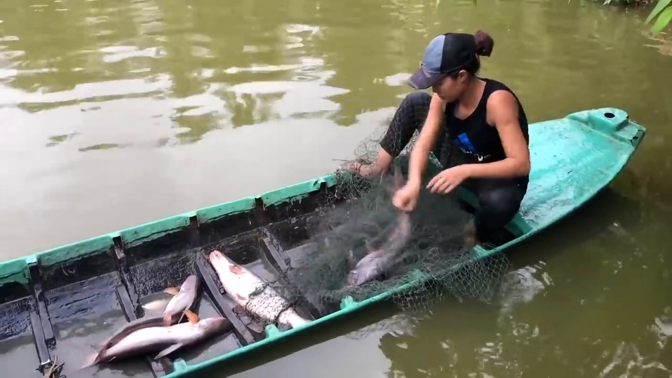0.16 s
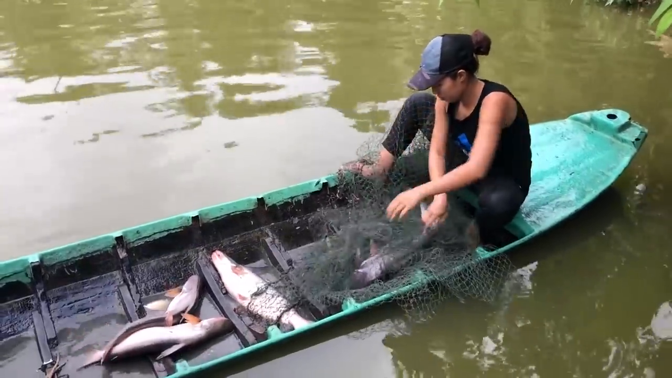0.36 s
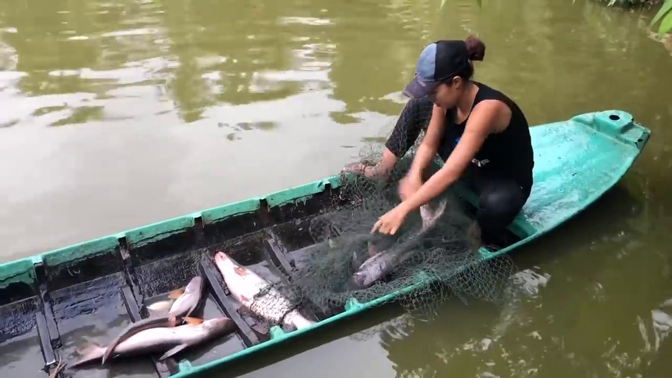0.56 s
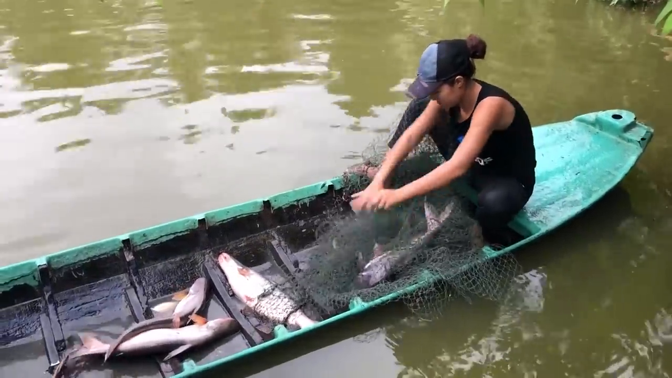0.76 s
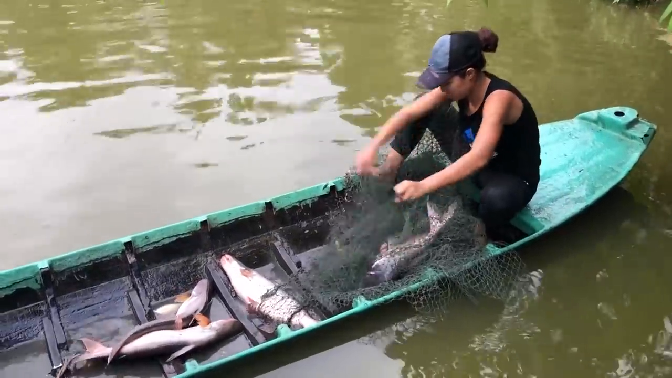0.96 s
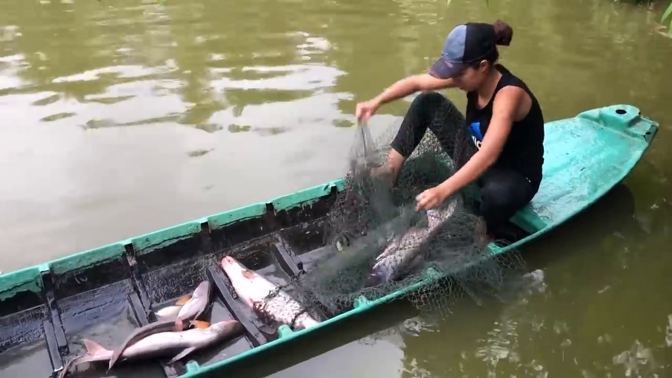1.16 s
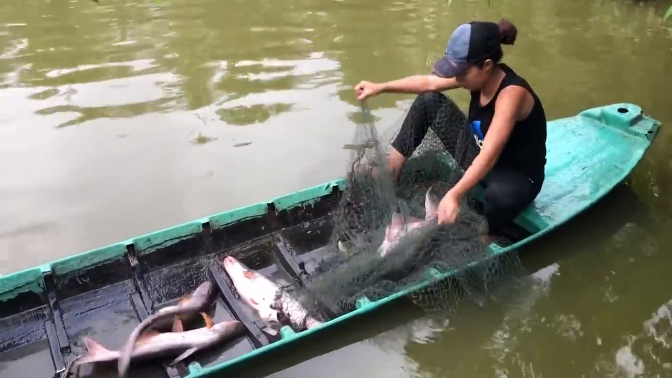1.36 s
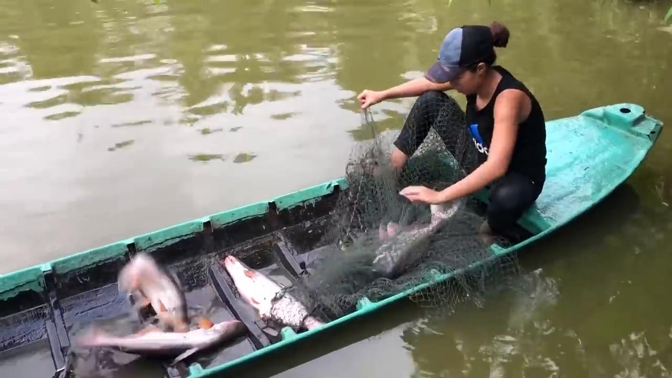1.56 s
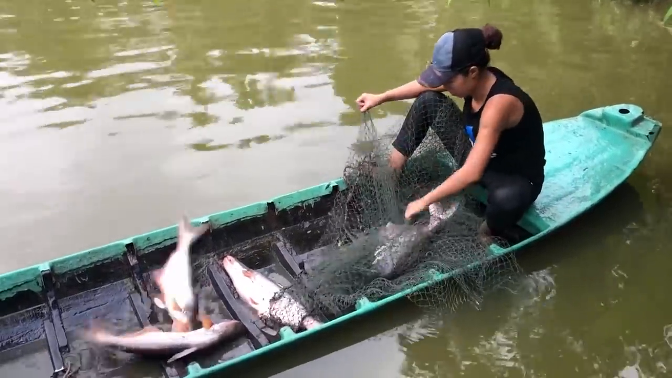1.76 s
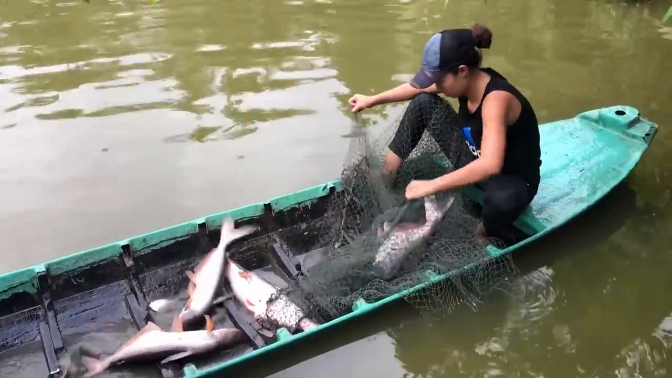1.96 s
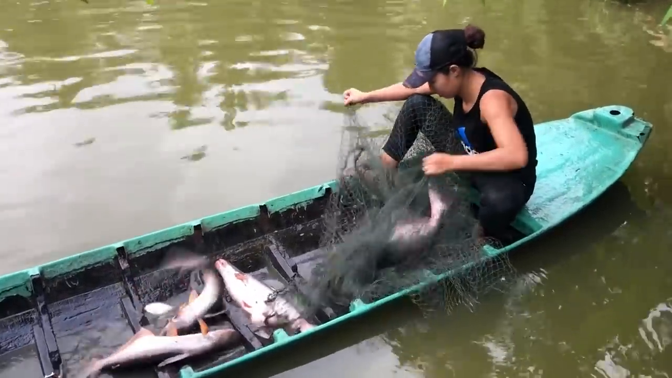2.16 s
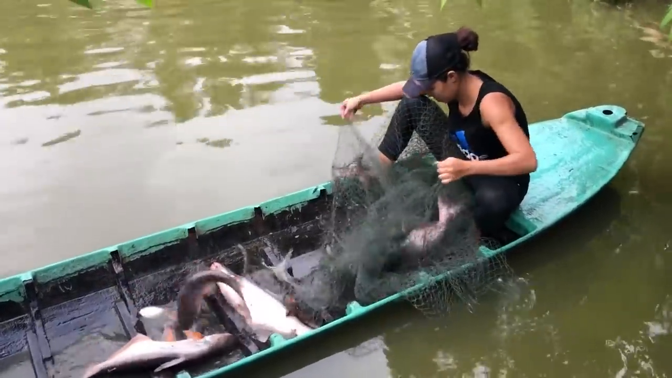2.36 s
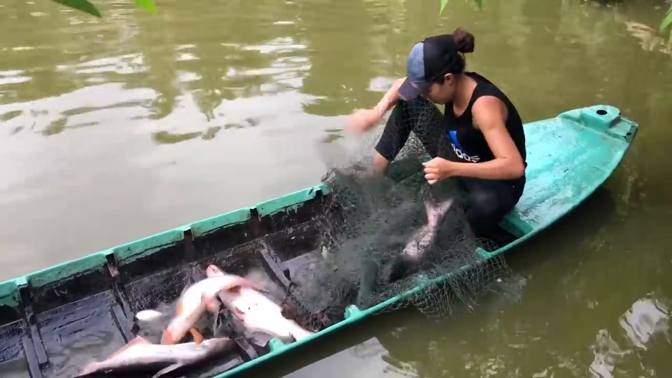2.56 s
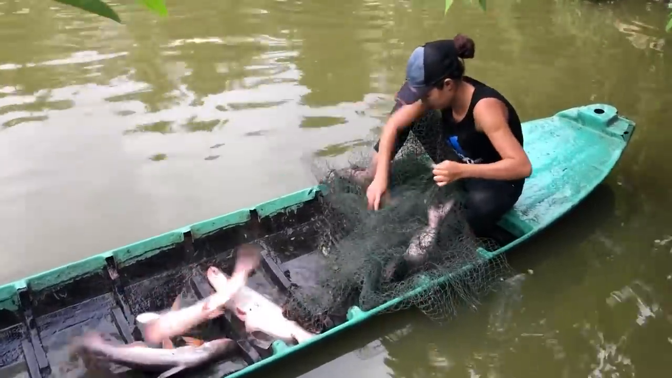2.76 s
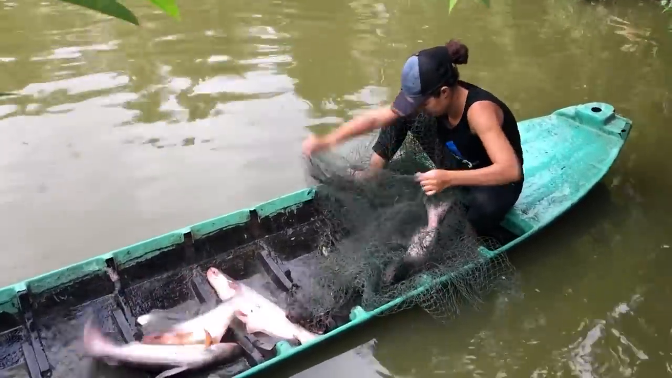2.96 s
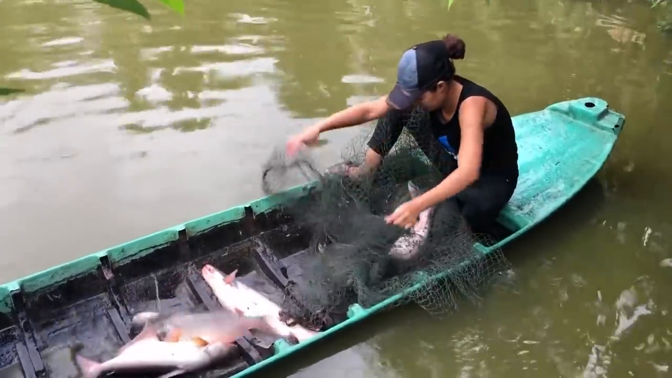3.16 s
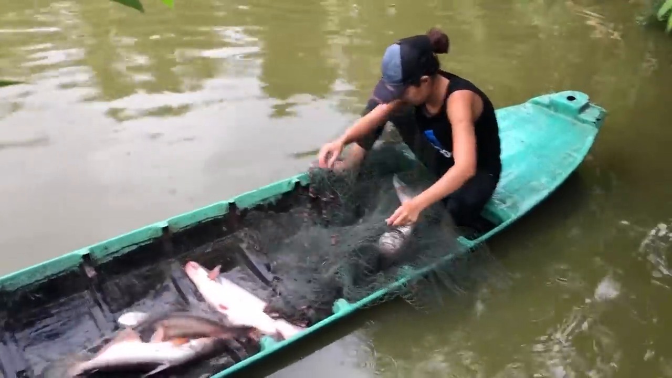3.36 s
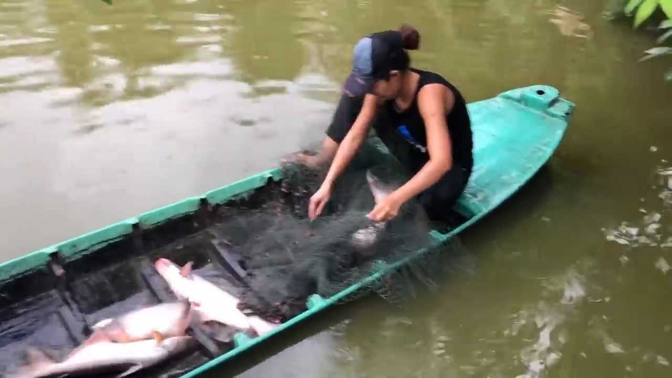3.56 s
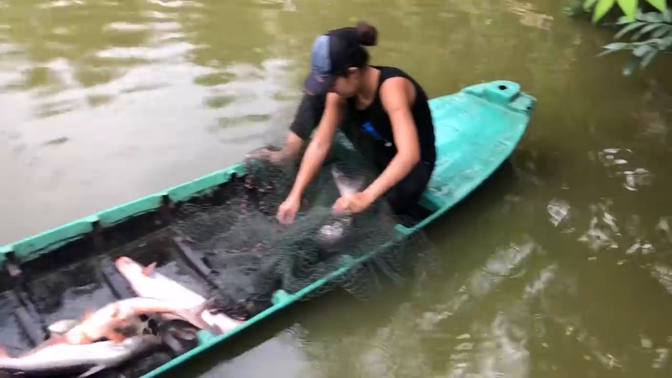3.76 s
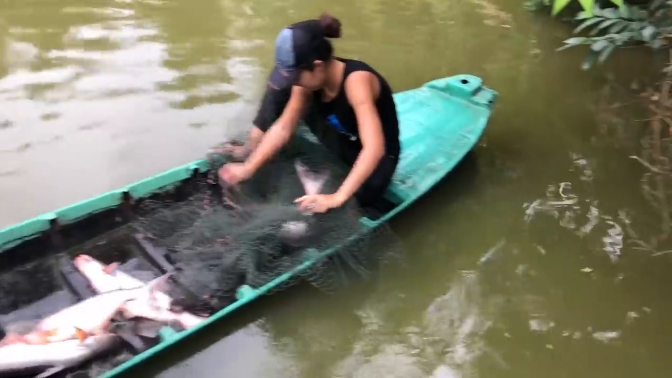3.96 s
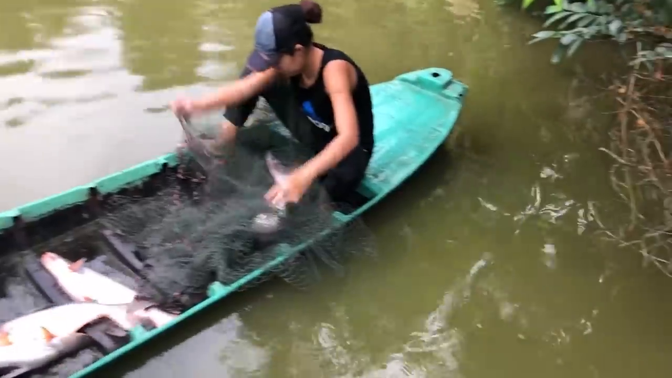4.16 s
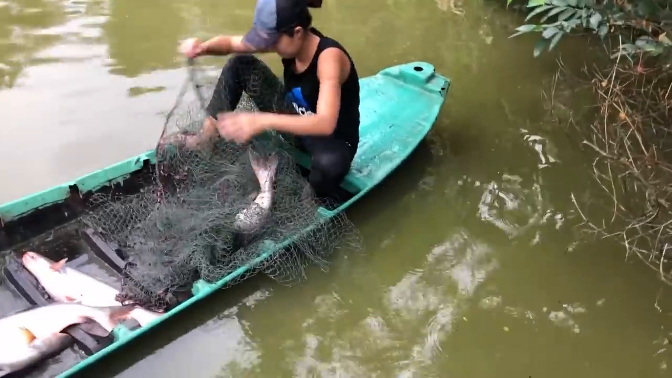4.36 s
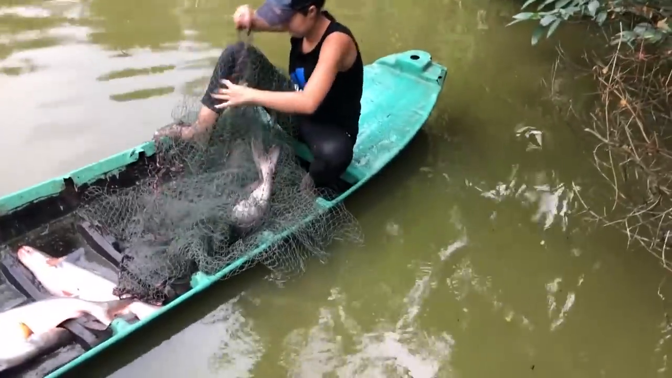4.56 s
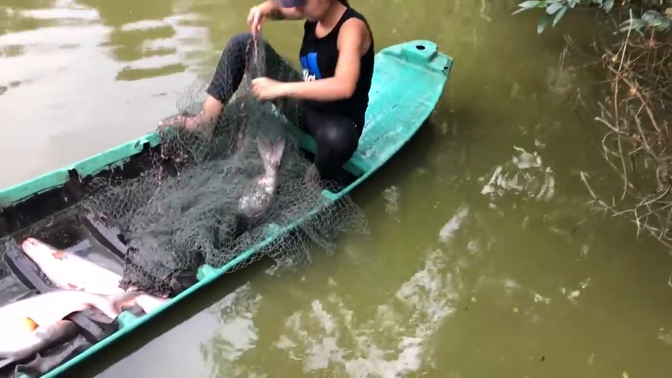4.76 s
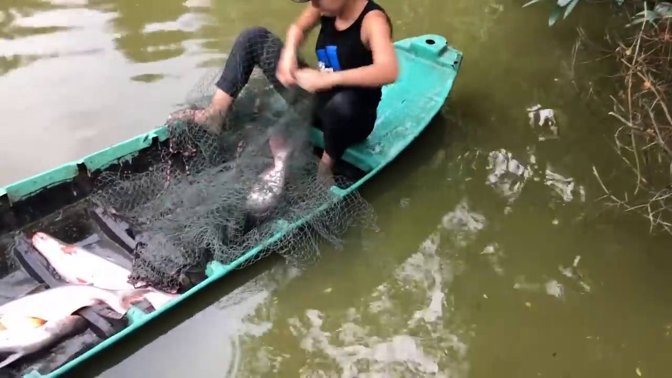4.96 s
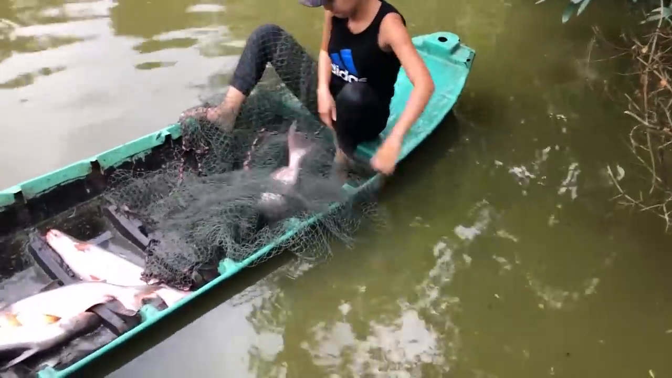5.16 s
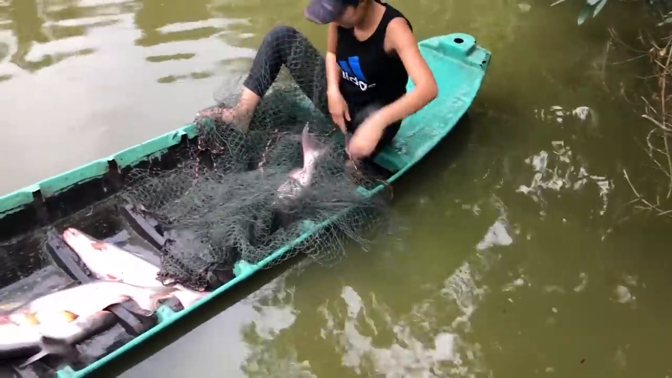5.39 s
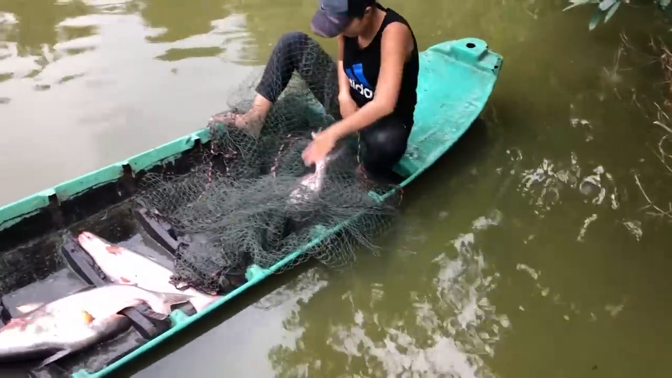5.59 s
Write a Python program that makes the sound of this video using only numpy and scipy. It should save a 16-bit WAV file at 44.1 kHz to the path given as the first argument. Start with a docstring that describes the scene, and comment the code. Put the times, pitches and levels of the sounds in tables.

```python
"""Fresh-caught fish flop in the bilge of a small canoe on a still pond, over a low wavering outdoor rumble.
It opens with faint net rustle (crackling noise), a barely stirred bilge, soft knocks (pitched rings) and
near 1 s small bright net snaps. From 1.5 to 3.8 s the fish flop hardest: slaps (filtered contact and spray
noise), knocks, a loud pop, hull thumps (struck modes), splashes and bubbles (gliding sines). It then calms
to light slaps and snaps, bubbles and net rustle, a knock at 5.3 s and a last faint stir of the water."""
import sys
import numpy as np
from scipy import signal
from scipy.fft import rfft, irfft, next_fast_len
from scipy.io import wavfile
from scipy.ndimage import uniform_filter1d

SR = 44100
rng = np.random.default_rng(int(sys.argv[2]) if len(sys.argv) > 2 else 0)


def transcribe(u):
    """Save the signal u as a 16-bit wav file named by the first command-line argument.

    u: samples, shape (n,) or (channels, n), limited to [-1, 1]; the rate is SR.
    q: integer samples, one column per channel.
    """
    v = np.clip(np.atleast_2d(u).T, -1, 1)
    q = np.round(v * 32767).astype(np.int16)
    wavfile.write(sys.argv[1], SR, q)


N = 248283
TIME = np.arange(N) / SR  # s
AGE = TIME[:SR // 3]  # s since a hit; the time base of every single hit
TOP_HZ = 16000  # top cut of the microphone, and the highest swarm bubble

# spectrum of the outdoor rumble and hiss: freq_hz, density_db (per Hz)
OUTDOOR_SPECTRUM = [(20, -10.5), (50, -2.5), (80, -4), (108, -2.5), (180, -9), (250, -15.5), (400, -25.5),
                    (700, -28.5), (1300, -28.5), (2200, -38.5), (5000, -40), (9400, -41.5), (16000, -47)]
OUTDOORS_DB = -58.5
# pulls on the net: start_s, length_s, level_db, brightness_db (fine hiss over coarse swish)
NET_PULLS = [(0, 0.37, -74, 9), (0.8, 0.13, -69, 9), (0.995, 0.41, -70, 3), (1.493, 2.1, -68, -4),
             (3.6, 0.69, -70.5, -2), (4.417, .45, -67.5, -30), (5.053, 0.51, -74.5, -3.5)]
NET_TIGHTEN_S, NET_SLACKEN_S = 0.039, 0.075
# bouts of wriggling that stir the bilge: start_s, length_s, slosh_db, spray_db
WRIGGLE_BOUTS = [(0, 0.26, -76.5, -89), (.42, .33, -77, -91), (1.472, 0.072, -55.5, -65),
                 (1.62, 0.18, -63.5, -65.5), (1.915, 0.14, -64, -65.5), (2.028, 0.034, -57, -67),
                 (2.35, 0.046, -69.5, -57), (2.461, 0.063, -65.5, -59), (2.558, 0.12, -57.5, -66),
                 (2.635, 0.065, -55.5, -51.5), (2.864, 0.08, -59, -56), (3.004, 0.19, -60.5, -62.5),
                 (3.225, 0.083, -58, -53.5), (3.306, 0.075, -53.5, -57), (3.422, .11, -58.5, -64.5),
                 (3.631, 0.033, -63, -67), (3.733, 0.064, -66.5, -73), (3.888, 0.34, -67, -71.5),
                 (5.301, 0.038, -67.5, -78), (5.45, 0.24, -77, -84)]
STIR_S, SETTLE_S, CALM_DB = 0.016, 0.053, -79  # water gets moving, settles, and laps on faintly
# spray is airborne briefly, thins out, and dribbles on
SPRAY_LAG_S, SPRAY_FALL_S, DRIBBLE_DB = 0.008, 0.049, -80
# spectrum of stirred water: freq_hz, density_db (per Hz)
WASH_SPECTRUM = [(150, -21.5), (500, -1.5), (1200, -6), (2500, -5.5), (6000, -18.5), (16000, -23.5)]
# single large bubbles, and the short pitched ring of a slap at 1.49 s:
# start_s, level_db, starting_pitch_hz, life_s
BUBBLES_AND_SLAP_RING = [(1.491, -37, 2190, 0.007), (1.604, -49, 1270, 0.018), (1.682, -39, 1296, 0.022),
                         (2.043, -44.5, 1946, 0.01), (2.088, -43, 964, 0.03), (2.394, -45.5, 1220, .009),
                         (2.466, -41.5, 846, 0.026), (2.592, -41, 895, 0.012), (2.612, -36.5, 554, .03),
                         (2.681, -46, 1435, .014), (2.697, -41, 1770, .017), (3.019, -41.5, 1070, 0.011),
                         (3.171, -43, 1090, 0.014), (3.307, -36.5, 1420, 0.01), (3.328, -41, 1350, 0.016),
                         (3.335, -37, 3390, .0075), (3.369, -37.5, 870, 0.012), (3.426, -44, 2450, .015),
                         (3.786, -34, 1600, 0.0098), (4.011, -47.5, 1740, 0.0063),
                         (4.062, -48.5, 703, 0.091), (4.216, -45, 1540, 0.011), (4.232, -41.5, 1076, 0.013),
                         (4.85, -54, 2290, .012), (4.892, -55, 2350, 0.0087), (5.021, -55, 728, 0.011)]
BUBBLE_RISE_OCT_PER_S = 13  # every row of that table climbs in pitch at the same pace
# body knocks on the planks, and one loud short pop at 3.73 s: start_s, level_db,
# starting_pitch_hz, plank_db (trim of plank ring and squelch against the pitched part)
KNOCKS_AND_POP = [(.103, -56.5, 720, 11), (0.174, -57, 604, 2), (.207, -55, 1190, 0),
                  (.229, -45.5, 1340, 2.5), (.283, -57.5, 647, -2.5), (.428, -60, 647, 6.5),
                  (1.487, -45, 426, -8), (1.493, -35.5, 626, -9), (1.505, -39, 590, -6),
                  (1.519, -40.5, 560, -1.5), (1.555, -44.5, 520, -7), (1.703, -45, 603, 1.5),
                  (2.333, -31.5, 1880, -4.5), (2.440, -41.5, 600, 3.5), (2.600, -39, 494, 1),
                  (2.634, -29, 573, -4.5), (2.899, -48.5, 990, 1), (3.1022, -34.5, 692, -3),
                  (3.3095, -30.5, 875, -11), (3.315, -35, 930, -12), (3.326, -34.5, 1010, -10),
                  (3.354, -28.5, 783, -26), (3.3595, -33.5, 853, -10.5), (3.423, -41.5, 684, -5),
                  (3.441, -43, 506, -0.5), (3.7285, -19.5, 1900, -19.5), (5.305, -49, 384, -1)]
POCKET_CYCLES = 23  # the pitched part falls by 60 dB in this many cycles of its starting pitch
# nominal ringing modes of the planks: pitch_hz, level_db, t60_s
PLANK_MODES = [(460, -6, 0.089), (615, -3.5, 0.12), (825, 3.5, 0.043), (1370, -1.5, 0.032),
               (1630, -1.5, 0.06), (1778, -5.5, 0.041), (2030, -10.5, 0.039)]
# spectrum of squelching wet skin: freq_hz, density_db (per Hz)
SQUELCH_SPECTRUM = [(150, -10), (500, -1.5), (1200, 4.5), (2200, -11), (3500, -19.5), (12000, -20.5)]
# wet slaps, and small bright snaps of the tugged net: start_s, level_db, contact_s, centre_hz, width_hz
SLAPS_AND_SNAPS = [(.968, -53, .003, 8700, 2500), (1.039, -41.5, 0.002, 9800, 4000),
                   (1.5546, -36, 0.0018, 3180, 6040), (1.658, -38, .0024, 3670, 1500),
                   (1.697, -38.5, 0.0034, 4570, 3500), (1.727, -40.5, .003, 2200, 2500),
                   (1.766, -28.5, 0.00073, 2980, 2960), (1.775, -36, 0.0011, 3970, 8000),
                   (1.8522, -51.5, 0.00075, 12000, 6000), (1.911, -32.5, 0.0026, 5700, 4900),
                   (1.992, -43, 0.0011, 9000, 4000), (2.3104, -43, 0.0036, 3200, 5000),
                   (2.327, -33, .003, 5000, 9000), (2.3337, -15.5, 0.00049, 4030, 2780),
                   (2.3332, -17.5, 0.00036, 10400, 6000), (2.444, -43.5, 0.0031, 5000, 8000),
                   (2.579, -33.5, .005, 5000, 8000), (2.6366, -22, 0.0018, 4220, 8000),
                   (2.865, -38.5, 0.0027, 3070, 7000), (2.89, -33.5, 0.0075, 2500, 6000),
                   (2.901, -33, 0.002, 3020, 7000), (3.0108, -36, 0.0032, 3600, 3000),
                   (3.034, -37.5, 0.0035, 2150, 5900), (3.0755, -27.5, 0.0022, 1900, 2500),
                   (3.0773, -26, .001, 3950, 4500), (3.233, -38.5, 0.0014, 2600, 5000),
                   (3.7288, -23.5, 0.0013, 2920, 1420), (3.908, -48, 0.0041, 7000, 6900),
                   (3.989, -41, 0.0039, 3340, 3840), (4.0743, -42.5, .0012, 5200, 5970),
                   (4.166, -49, 0.0036, 3500, 1200), (4.355, -52, .0017, 6030, 2500)]
SPRAY_DB = -10  # every hit carries the same share of spray noise
SWEEP_DB, SWEEP_S = -18, 0.0039  # a swish swells just before each hit
# heavy bodies landing on the hull: start_s, level_db
HULL_THUMPS = [(1.491, -38), (1.772, -33.5), (1.794, -30), (2.331, -39.5), (2.633, -37), (2.669, -33)]
# nominal modes of the floating hull: pitch_hz, level_db, t60_s
HULL_MODES = [(73.6, -11, 0.032), (106, -5, 0.077), (173.5, -2, 0.048), (260, -6, 0.031)]
# response of the microphone: freq_hz, gain_db
MICROPHONE_RESPONSE = [(20, 3), (5000, -3.5), (6500, -3.5), (9200, -0.5), (10500, -7), (11800, -6.5),
                       (13200, -1.5), (14500, -6.5), (16000, -6.5)]


def undb(db):
    """Decibels to gain."""
    return 10 ** (np.asarray(db) / 20)


def unit(x):
    """Scale to rms 1."""
    return x / np.sqrt(np.mean(x ** 2))


def blow(x):
    """Scale a short sound to the energy of one millisecond at full scale."""
    return x * np.sqrt(SR / 1000 / np.sum(x ** 2))


def fade(t60, age=AGE):
    """Exponential decay by 60 dB in t60 seconds."""
    return np.exp(-np.log(1000) * age / t60)


def add(track, s, sound):
    """Mix a sound into the track at time s."""
    i = min(max(int(s * SR), 0), N)
    track[i:i + len(sound)] += sound[:N - i]


def gesture(s, length, attack, release):
    """Envelope of one movement: builds up, holds until its length is over, dies away."""
    build = np.clip((TIME - s) / attack, 0, 1)
    return build * np.exp(-np.maximum(TIME - s - length, 0) / release)


def walk(rate, size=N):
    """Smooth random wander with an rms of 1, heading for a new value rate times a second."""
    k = int(SR / rate)
    steps = np.repeat(rng.standard_normal(size // k + 1), k)
    return unit(uniform_filter1d(steps, k)[:size])


def resonate(x, hz, width):
    """Two-pole band-pass around hz, with a limit on centre and width."""
    hz = min(hz, 0.4 * SR)
    q = max(hz / width, 3 * hz / SR)
    return signal.lfilter(*signal.iirpeak(hz, q, fs=SR), x)


def colour(x, points):
    """Causal minimum-phase filter with the given (Hz, dB) response."""
    hz, db = np.transpose(points)
    size = next_fast_len(len(x) + SR // 4) // 2 * 2
    bins_hz = np.arange(size // 2 + 1) * SR / size + 1  # 1 Hz up, so the log is finite
    gain = undb(np.interp(np.log(bins_hz), np.log(hz), db))
    # folding the cepstrum onto positive time makes the filter causal
    cepstrum = irfft(np.log(gain))
    cepstrum[1:size // 2] *= 2
    cepstrum[size // 2 + 1:] = 0
    return irfft(rfft(x, size) * np.exp(rfft(cepstrum)))[:len(x)]


def crackle(rate, size_db, t60):
    """Dense tiny clicks of uneven size, rate per second, layered with a short noise tail behind each."""
    chance, size = rng.random(N), np.clip(rng.standard_normal(N), -2, 2)
    clicks = (chance < rate / SR) * undb(size_db * size) * rng.choice([-1, 1], N)
    tail_power = np.abs(signal.fftconvolve(clicks ** 2, fade(t60) ** 2)[:N])
    tail = rng.standard_normal(N) * np.sqrt(tail_power)
    return unit(unit(clicks) + unit(tail))


def bubble(hz, life, rise, swell=0.2):
    """A pocket of air swells into its ring and climbs rise octaves over its life as it nears the surface."""
    age = TIME[:int(2 * life * SR)] / life  # in lives
    pitch = hz * 2 ** (rise * np.minimum(age, 1))
    return blow(age * np.exp(-age / swell) * np.sin(2 * np.pi * np.cumsum(pitch) / SR))


def swarm(centre_hz, octaves, size_db, cycles, count):
    """A crowd of bubbles of uneven size and pitch, rms 1; higher ones ring shorter."""
    out = np.zeros(N)
    spread = octaves * np.clip(rng.standard_normal(128), -2, 2)
    pitches = np.minimum(centre_hz * 2 ** spread, TOP_HZ)
    shapes = [bubble(hz, cycles / hz, rng.uniform(0, 0.43)) for hz in pitches]
    times = rng.uniform(0, N / SR, count)
    sizes = undb(size_db * np.clip(rng.standard_normal(count), -2, 2))
    for k in range(count):
        add(out, times[k], sizes[k] * shapes[k % len(shapes)])
    return unit(out)


def ring(modes):
    """Struck modes; every spot of the boat weights and tunes them a little differently."""
    chance = rng.standard_normal((len(modes), 2)) * [2, 0.025]  # dB, fraction of pitch
    out = np.zeros(len(AGE))
    for (hz, db, t60), (off_db, detune) in zip(modes, chance):
        out += undb(db + off_db) * fade(t60) * np.sin(2 * np.pi * hz * (1 + detune) * AGE)
    return blow(out)


def outdoors(waver_db=1.0):
    """A low, gently wavering rumble with a faint hiss above, made of coloured noise."""
    air = unit(colour(rng.standard_normal(N), OUTDOOR_SPECTRUM))
    return undb(OUTDOORS_DB) * air * undb(waver_db * walk(14))


def net(catch_db=2.0, catch_per_s=22):
    """Thin strands catch and slip: a fine hiss when pulled taut, a coarser swish when lifted in a bunch."""
    fine = unit(resonate(crackle(rate=4500, size_db=13, t60=0.02), 9800, 9000))
    coarse = unit(resonate(crackle(rate=5000, size_db=8.5, t60=0.021), 2400, 5000))
    out = np.zeros(N)
    for s, length, db, bright_db in NET_PULLS:
        bright = undb(bright_db)
        rustle = (bright * fine + coarse) / np.hypot(bright, 1)
        out += undb(db) * gesture(s, length, NET_TIGHTEN_S, NET_SLACKEN_S) * rustle
    return out * undb(catch_db * walk(catch_per_s))


def bilge(wash_db=-5.0):
    """Large bubbles and one slap's ring (rising sines) over a swarm of small bubbles and stirred water."""
    rings = np.zeros(N)
    for s, db, hz, life in BUBBLES_AND_SLAP_RING:
        add(rings, s, undb(db) * bubble(hz, life, BUBBLE_RISE_OCT_PER_S * life, swell=0.21))
    small = swarm(centre_hz=1819, octaves=0.78, size_db=6.5, cycles=8.4, count=1900)
    wash = unit(colour(rng.standard_normal(N), WASH_SPECTRUM))
    stirs = [undb(db) * gesture(s, length, STIR_S, SETTLE_S) for s, length, db, _ in WRIGGLE_BOUTS]
    slosh = np.hypot(undb(CALM_DB), np.linalg.norm(stirs, axis=0))  # bouts add in power
    return rings + slosh * (small + undb(wash_db) * wash)


def droplets(patter_db=-2):
    """Thrown water patters back onto fish and planks; tiny bubbles fizz in it."""
    fizz = swarm(centre_hz=5960, octaves=0.6, size_db=4.5, cycles=17, count=2400)
    patter = unit(resonate(crackle(rate=1100, size_db=12.5, t60=0.061), 6500, 11000))
    showers = [undb(db) * gesture(s + SPRAY_LAG_S, length, STIR_S, SPRAY_FALL_S)
               for s, length, _, db in WRIGGLE_BOUTS]
    spray = np.hypot(undb(DRIBBLE_DB), np.linalg.norm(showers, axis=0))
    return spray * unit(fizz + undb(patter_db) * patter)


def drips(level_db=-81):
    """The wet net drips faintly into the bilge at random moments, each drip a bubble."""
    return undb(level_db) * swarm(centre_hz=1920, octaves=0.5, size_db=3.5, cycles=21, count=45)


def knocks_and_pop(onset_s=0.0014, rise_per_s=3.6, wobble=0.072, squelch_db=-1.5, squelch_t60=0.059):
    """A body squeezes water against ringing planks and wet skin squelches; one pop shares this recipe."""
    out = np.zeros(N)
    for s, db, hz, plank_db in KNOCKS_AND_POP:
        # in a knock the water pocket shrinks unevenly, so its pitch rises and wobbles
        pitch = hz * (1 + rise_per_s * AGE + wobble * walk(450, size=len(AGE)))
        envelope = fade(POCKET_CYCLES / hz) * (1 - np.exp(-AGE / onset_s))
        pocket = envelope * np.sin(2 * np.pi * np.cumsum(pitch) / SR)
        squelch = colour(rng.standard_normal(len(AGE)) * fade(squelch_t60), SQUELCH_SPECTRUM)
        planks = 0.72 * ring(PLANK_MODES) + undb(squelch_db) * blow(squelch)
        add(out, s, undb(db) * (blow(pocket) + undb(plank_db) * planks))
    return out


def slaps_and_snaps(snap_contact_s=0.0015, spray_t60=0.073, grain_db=4.0):
    """Wet slaps and net snaps: a contact, then a short burst of spray noise. Quick contacts click more."""
    out = np.zeros(N)
    for s, db, contact, hz, width in SLAPS_AND_SNAPS:
        film, drops, skim = rng.standard_normal((3, len(AGE)))
        # short contacts lean to a single click, long ones to a smear of noise
        snap = np.exp(-contact / snap_contact_s)
        click = blow(signal.unit_impulse(len(AGE)))
        smear = blow(film * np.sqrt(AGE) * np.exp(-AGE / contact))
        push = snap * click + (1 - snap) * smear
        grain = undb(grain_db * walk(500, size=len(AGE)))
        spray = drops * fade(spray_t60) * (1 - np.exp(-AGE / contact)) * grain
        # the spray is broader in pitch than the contact
        thrown = undb(SPRAY_DB) * blow(resonate(spray, hz, 1.7 * width))
        add(out, s, undb(db) * (blow(resonate(push, hz, width)) + thrown))
        # the sweep swells up to the moment of the hit
        sweep = skim * np.exp((AGE - AGE[-1]) / SWEEP_S)
        add(out, s - AGE[-1], undb(db + SWEEP_DB) * blow(resonate(sweep, hz, width)))
    return out


def thumps(push_s=0.0073):
    """Soft, heavy blows move only the low modes of the hull."""
    out = np.zeros(N)
    for s, db in HULL_THUMPS:
        add(out, s, undb(db) * blow(ring(HULL_MODES) * (1 - np.exp(-AGE / push_s))))
    return out


def surroundings(x, side_s=0.0033, side_db=-15, bank_db=-15, bank_t60=0.2):
    """A quick reflection off the side of the boat, then a faint scatter from the leafy bank."""
    scatter = rng.standard_normal(len(AGE)) * fade(bank_t60) * (1 - np.exp(-AGE / 0.00077))
    echo = resonate(scatter, 4500, 10000)
    echo = undb(bank_db) * echo / np.linalg.norm(echo)
    side = np.interp(TIME - side_s, TIME, resonate(x, 2000, 3700))
    return x + undb(side_db) * side + signal.fftconvolve(x, echo)[:N]


def scene():
    """Fish, water and net snaps in the boat with their reflections, plus net rustle and the open air."""
    boat = bilge() + droplets() + drips() + knocks_and_pop() + slaps_and_snaps() + thumps()
    return (outdoors() + net() + surroundings(boat))[None]


def record(dry):
    """A small microphone with an uneven treble and a steep top cut."""
    heard = colour(dry[0], MICROPHONE_RESPONSE)[None]
    top_cut = signal.ellip(10, 0.2, 70, TOP_HZ, fs=SR, output="sos")
    return signal.sosfilt(top_cut, heard)


dry = scene()
out = record(dry)
transcribe(out)
```